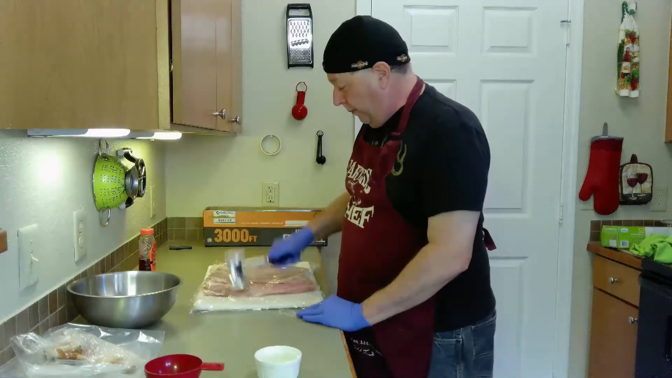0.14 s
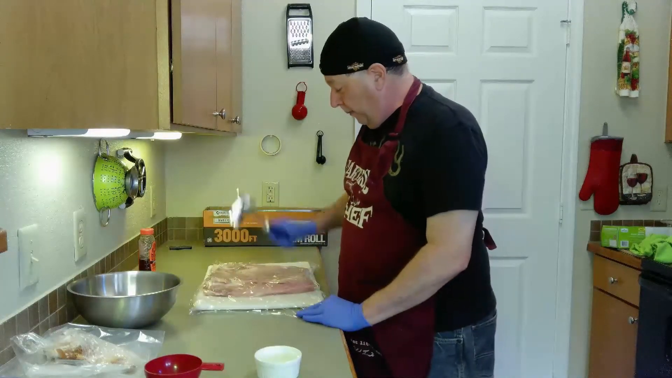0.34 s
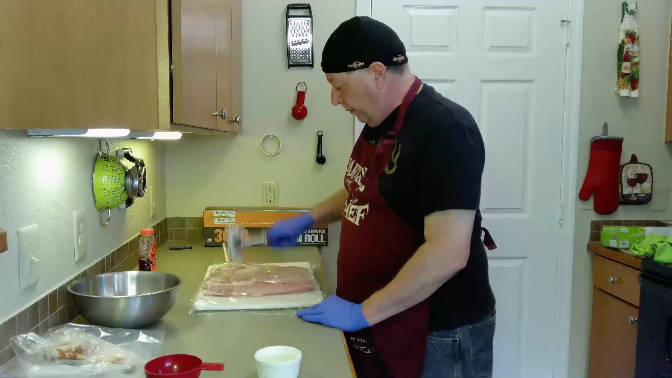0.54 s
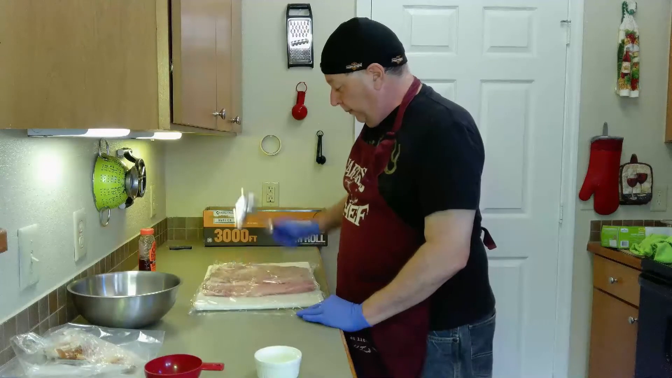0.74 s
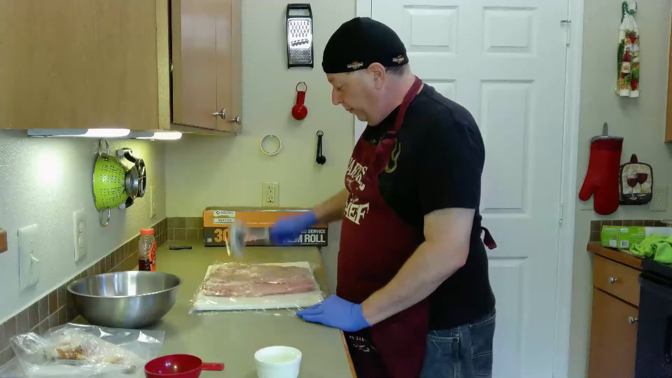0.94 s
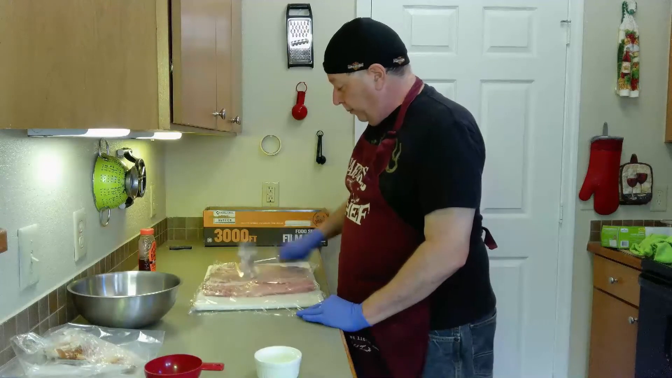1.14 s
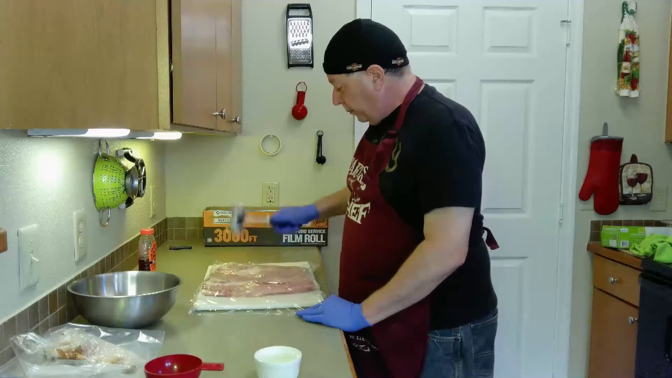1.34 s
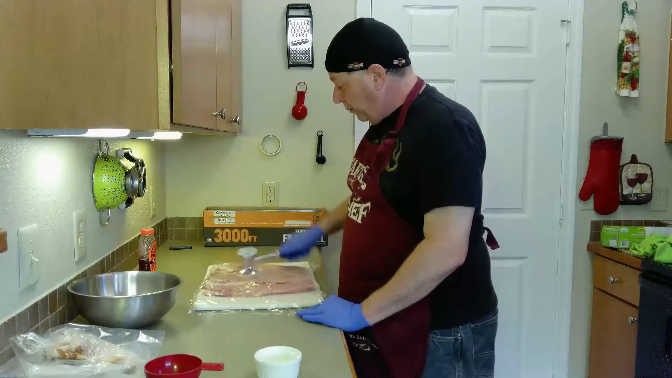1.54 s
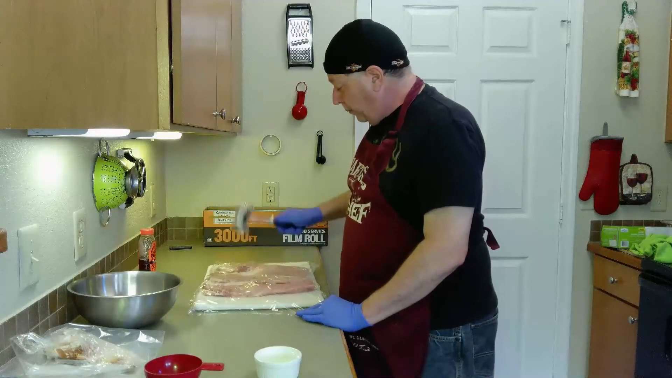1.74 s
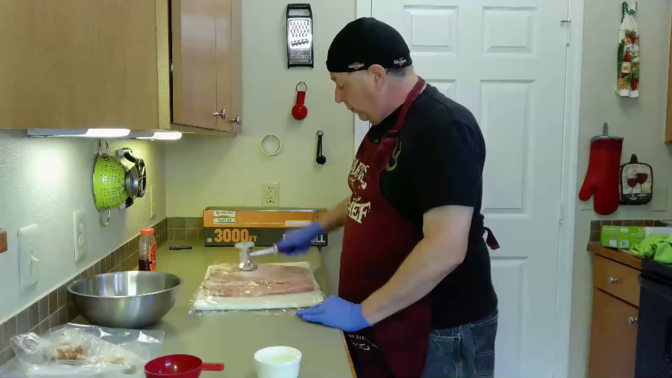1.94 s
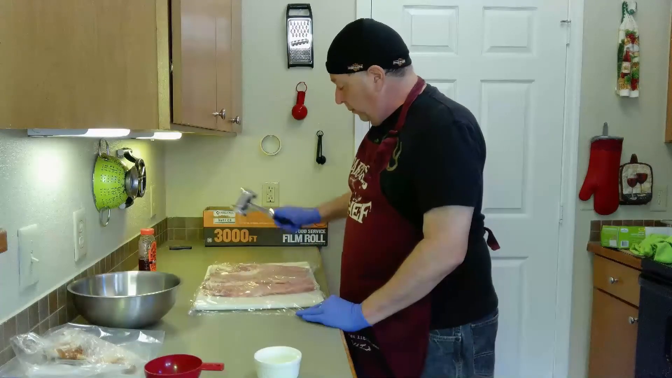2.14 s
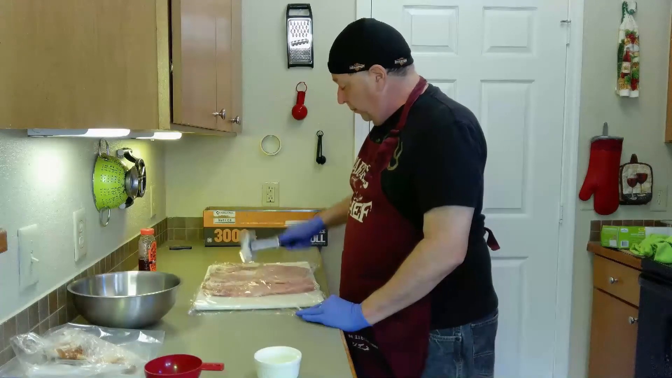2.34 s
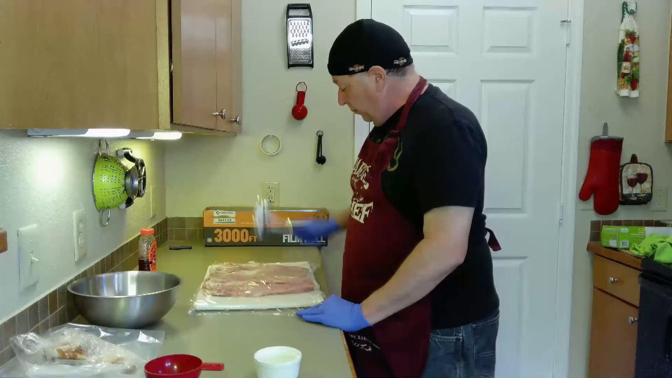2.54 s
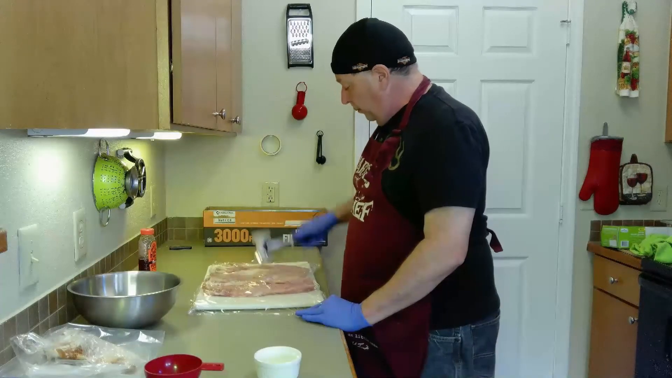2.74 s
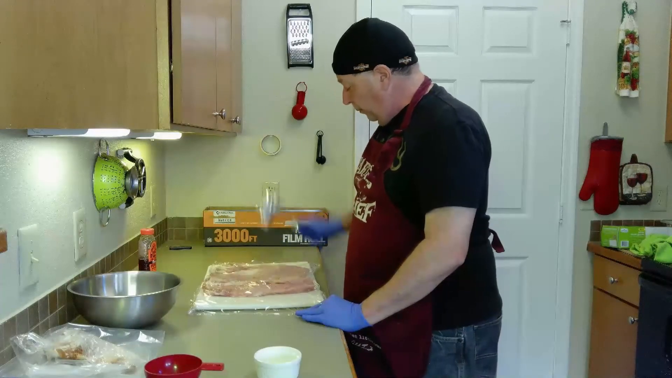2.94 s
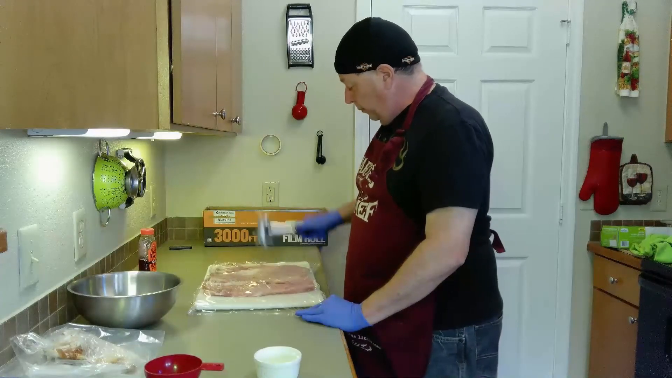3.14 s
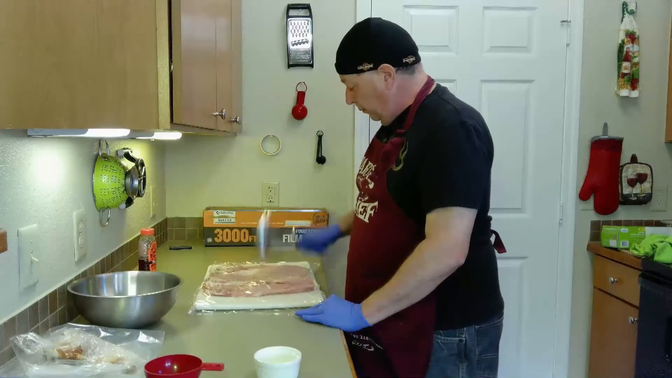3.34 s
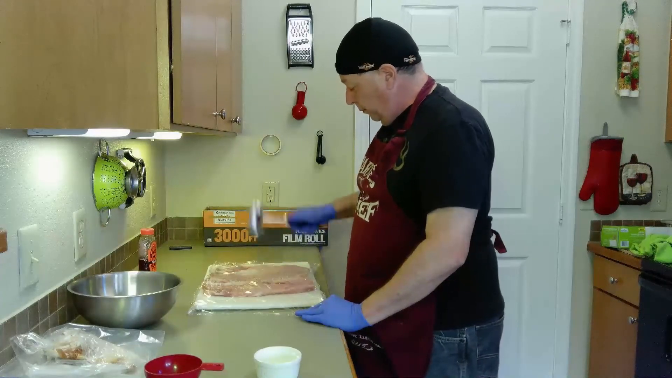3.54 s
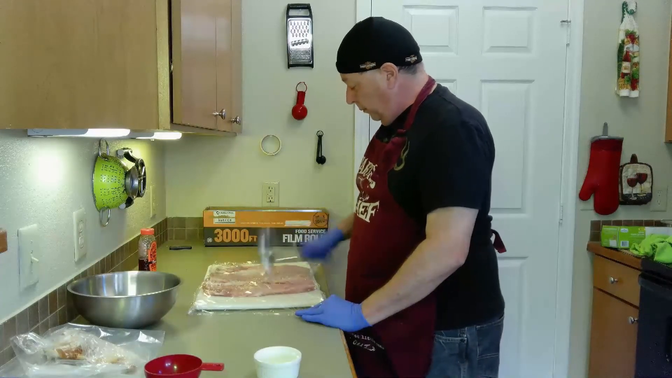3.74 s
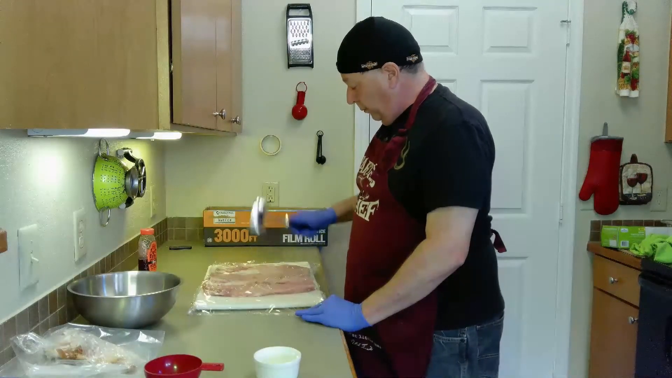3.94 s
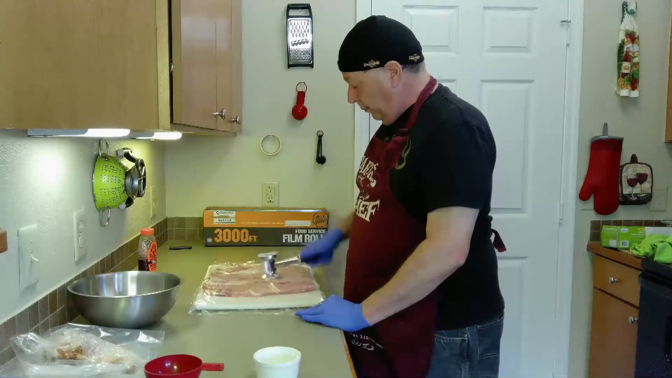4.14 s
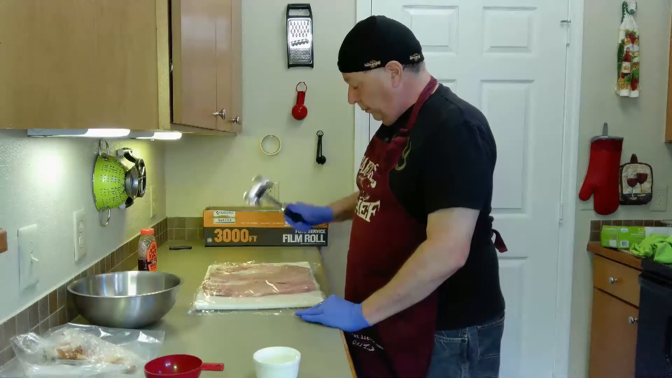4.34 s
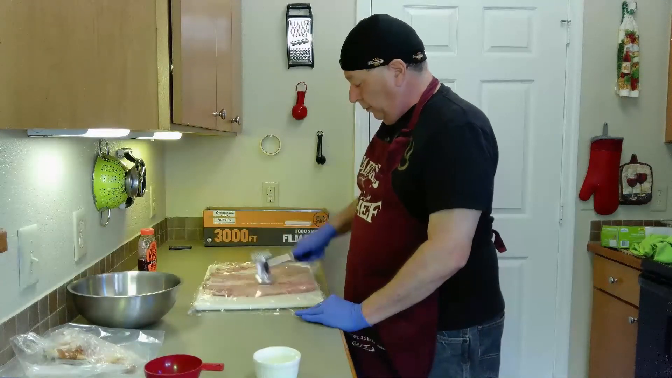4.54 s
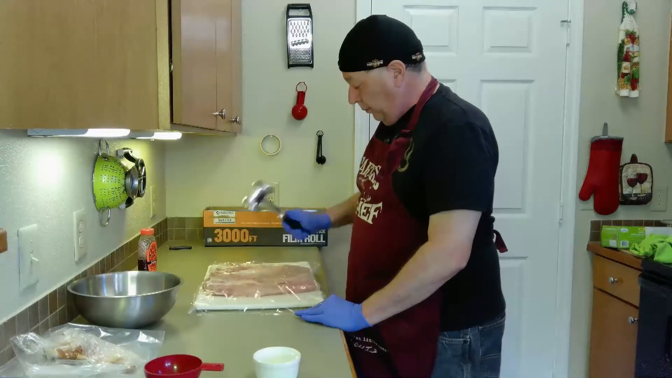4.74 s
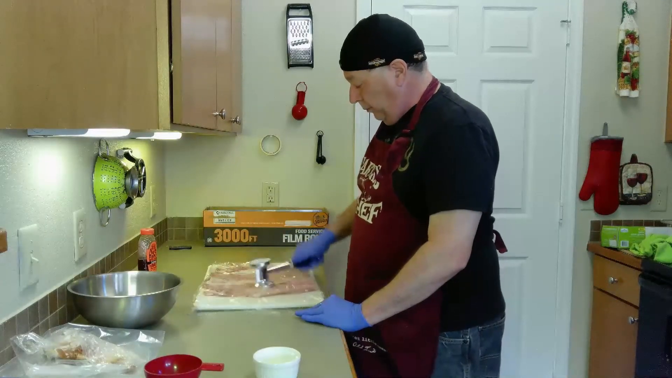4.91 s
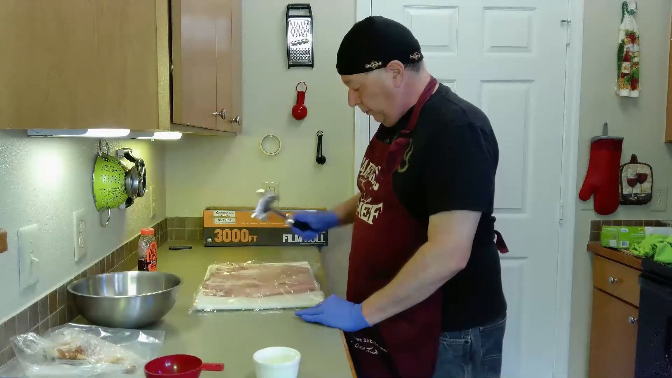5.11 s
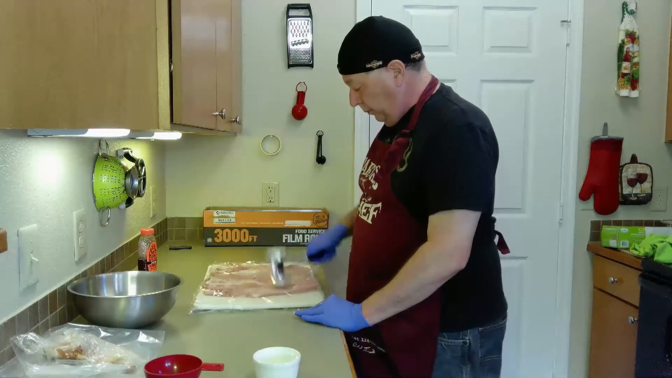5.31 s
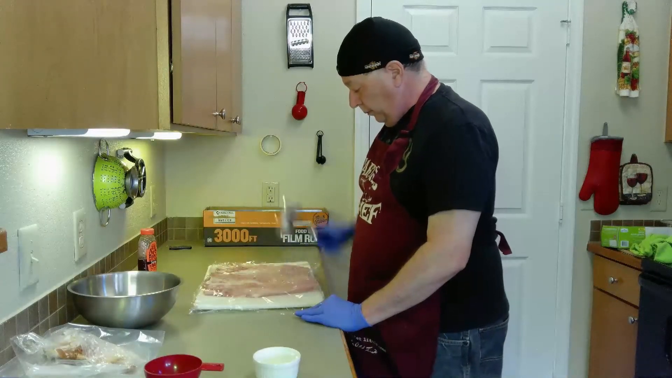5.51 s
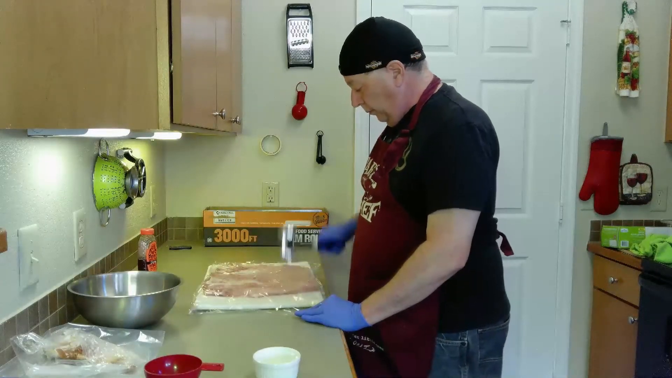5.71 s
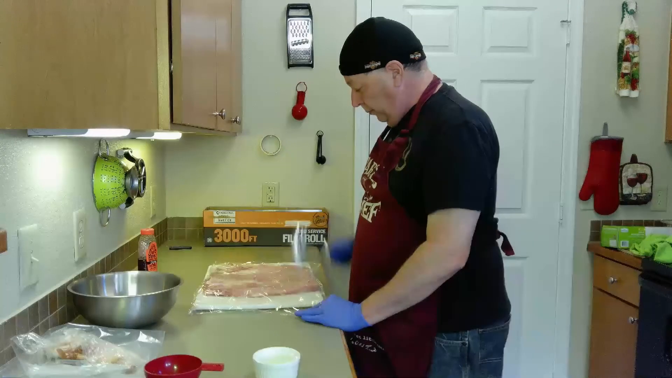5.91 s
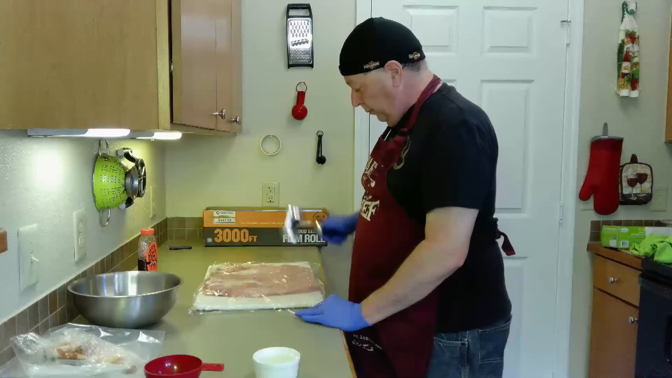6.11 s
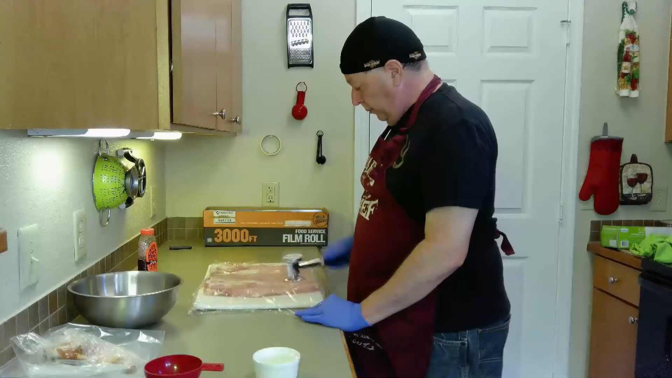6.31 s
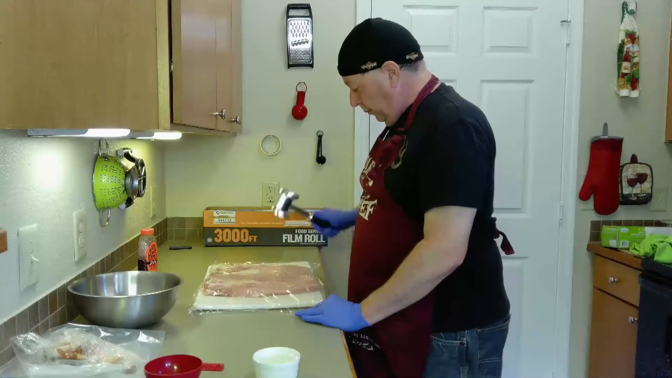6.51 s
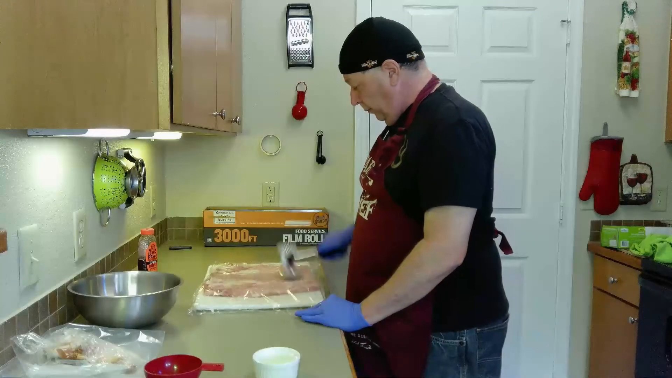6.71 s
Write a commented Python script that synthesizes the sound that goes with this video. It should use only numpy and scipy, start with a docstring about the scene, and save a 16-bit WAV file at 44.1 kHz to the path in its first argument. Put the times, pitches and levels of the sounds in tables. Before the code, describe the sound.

In a small, hard-walled kitchen, a metal mallet strikes plastic-covered meat at a steady pace, nearly three blows a second. Each is a bright, crackling wet slap with a low board knock and counter thud beneath, then a short tiled echo and sometimes a faint high metallic ring. Very quiet appliance hum lies underneath. One microphone at room distance slightly flattens the loudest cracks.

```python
"""A low appliance hum and still air in a small kitchen, then steady blows: a metal mallet on meat under film.
Each blow slaps the trapped air out (shaped noise), with tile and cupboard echoes and faint late treble noise.
The board knocks and the counter thuds (low modes and noise), and two close modes ring faintly in the mallet.
The room's tail is decaying noise. One microphone channel rounds off the loudest cracks and stops at a top frequency."""
import sys
import numpy as np
from scipy import signal
from scipy.fft import rfft, irfft, next_fast_len
from scipy.io import wavfile
from scipy.ndimage import uniform_filter1d

SR = 44100
rng = np.random.default_rng(int(sys.argv[2]) if len(sys.argv) > 2 else 0)


def write(x):
    x = np.atleast_2d(x).T
    wavfile.write(sys.argv[1], SR, np.round(np.clip(x, -1, 1) * 32767).astype(np.int16))

N = 302526

# Still room air, before levelling. Each row: frequency in Hz, gain in dB.
AIR_SPECTRUM = [(25, -3.5), (65, 3.5), (110, -4.5), (250, -10), (600, -15.5), (1500, -19.5), (3000, -26.5),
                (8000, -30.5), (15000, -32.5)]
# Appliance hum. Each row: frequency in Hz, rms level in dB.
HUM_TONES = [(59.8, -52.5), (70.5, -56.5), (120, -63)]
# The blows; smack on the film and jolt into the board are relative to an ordinary blow.
# Each row: first touch in seconds, lag from touch to slap in seconds, smack in dB, brightness in dB per octave,
# air pocket resonance in Hz, treble peak in dB, jolt in dB.
BLOWS = [(0.1469, 0.0048, 6, 0, 3030, -2, 6.5), (0.5108, 0.0028, 0.8, 0.7, 1500, -3.5, -4.5),
         (0.881, 0.0013, -0.5, -1.8, 2680, 2.5, 6.5), (1.2416, 0.001, 6.5, 1.85, 6090, 0.5, -2.5),
         (1.596, 0.0007, -0.5, 2, 2970, 2.5, -11), (1.96, 0.0006, -1.5, 0.56, 5620, -1.5, -4),
         (2.335, 0.0062, 1.7, 1.6, 5140, -1, -7.5), (2.699, 0.001, -4.5, -1, 3800, -0.5, -8.5),
         (3.0849, 0.0068, 1.5, -0.5, 2120, -2, -1.5), (3.4707, 0.0007, -4, -0.3, 5200, 1, -14.5),
         (3.831, 0.00074, -2.5, -0.8, 2900, 5, 4.5), (4.201, 0.0012, 5, -1.5, 2716, 7, 8),
         (4.5789, 0.0011, -3, -2, 1640, -1, 5), (4.942, 0.0015, -2.5, -1.1, 1570, 3.5, 4),
         (5.2997, 0.0065, 4.5, 0.94, 6260, -0.5, 3), (5.669, 0.0058, -1.7, 0, 5340, -2, 2.5),
         (6.011, 0.0033, 3.5, -0.76, 2540, 1.5, 6.5), (6.3558, 0.0005, -3.5, -0.06, 1090, 4, -11),
         (6.723, 0.002, -1.2, -1.4, 1710, 12, -2)]
# Film on wet meat, before levelling. Each row: frequency in Hz, gain in dB.
SLAP_SPECTRUM = [(150, -29), (400, -10), (650, -2), (1300, 1), (2200, -1), (4500, -1), (7200, -1),
                 (8400, -7), (9200, -23), (12000, -41)]
# What the walls keep of the slap after many bounces. Each row: frequency in Hz, gain in dB.
WALL_COLOUR = [(400, 4), (1500, 1.5), (3500, -2.5), (6800, -3), (8600, -3.5)]
# The kitchen's decay. Each row: frequency in Hz, t60 in seconds.
KITCHEN_DECAY = [(60, 0.46), (250, 0.37), (1000, 0.51), (3000, 0.32)]
# Late treble noise after each slap, before levelling. Each row: frequency in Hz, gain in dB.
LATE_TREBLE_SPECTRUM = [(5000, -17), (8500, 0.5), (10000, -6), (12500, -15), (14500, -18.5), (15600, -29)]
# Counter and cupboard modes. Each row: frequency in Hz, relative strength in dB, t60 in seconds.
COUNTER_MODES = [(44.3, -6.5, 0.33), (57.3, -3, .27), (74.64, -5, 0.72), (96.5, 3.5, 0.24),
                 (123.4, -3, 0.22), (137.7, -1.5, 0.26)]
# Dull boom of the room under the blow, before levelling. Each row: frequency in Hz, gain in dB.
BOOM_SPECTRUM = [(22, -38.5), (45, -0.5), (110, -1), (170, -0.5), (260, -16.5), (700, -46), (2000, -69.5)]
# Knock of the cutting board, before levelling. Each row: frequency in Hz, gain in dB.
BOARD_SPECTRUM = [(90, -23.5), (180, -0.5), (230, 1), (330, -0.5), (390, -6), (520, -11.5), (900, -15),
                  (3000, -58.5)]
# The mallet's close pair of bending modes. Each row: frequency in Hz, relative strength in dB, t60 in seconds.
MALLET_MODES = [(2493, 2, 0.38), (2502, 2, 0.3)]

TOP_HZ = 15700  # upper band limit
BLOW_SPAN = 0.12  # s over which the sounds of a blow are levelled
PEAK_HZ = 7880  # centre of the slap's narrow treble boost or cut
SLAP_DB = -21  # slap of an ordinary blow
# A jolting blow fills the room; a sharp smack stands out of it (dB, dB per dB).
ROOM_DB, ROOM_PER_JOLT, ROOM_PER_SMACK = 7, 0.21, -0.3
# Resonance of fully sealed air, stronger the harder it is squeezed (dB, dB per dB).
POCKET_DB, POCKET_PER_SMACK = 6.5, 0.9
LEAK_S = 0.004  # a head landing on its edge lets air leak: the resonance in dB falls by e per this much lag
# Late treble follows smack and treble peak (dB, dB per dB) and brightness (octaves).
TREBLE_DB, TREBLE_PER_SMACK, TREBLE_PER_PEAK, TREBLE_OCTAVES = -40, 0.4, 0.3, 2.1
THUD_DB, THUD_PER_JOLT = -27.5, 0.14  # a hard jolt shakes the counter a little more (dB, dB per dB)
# The board knocks with both jolt and smack (dB, dB per dB).
KNOCK_DB, KNOCK_PER_JOLT, KNOCK_PER_SMACK = -28.3, 0.23, 0.47
CUSHION = 0.45  # trapped air cushions the knock (dB per dB of air pocket)
RING_DB = -35.5  # mallet ring of an ordinary blow


def amp(db):
    """Amplitude ratio of a level in dB."""
    return 10 ** (np.asarray(db) / 20)


def along(points, hz):
    """Interpolate (Hz, value) points on a log-frequency axis."""
    point_hz, values = np.transpose(points)
    return np.interp(np.log(hz + 1), np.log(point_hz + 1), values)


def level(x, span=None):
    """x scaled to rms 1 over its first span seconds (all of it by default)."""
    head = x if span is None else x[:int(span * SR)]
    return x / np.sqrt(np.mean(head ** 2) + 1e-20)


def fade(t, t60):
    """Exponential decay, 60 dB down after t60."""
    return np.exp(-np.log(1000) * t / t60)


def bump(hz, centre_hz, octaves):
    """A bell curve of height 1 on a log-frequency axis."""
    return np.exp(-(np.log2((hz + 1) / centre_hz) / octaves) ** 2)


def colour(x, curve):
    """Causal minimum-phase filter whose gain in dB is curve(Hz)."""
    size = 2 * next_fast_len(len(x))
    gain = amp(curve(np.fft.rfftfreq(size, 1 / SR)))
    cepstrum = irfft(np.log(gain + 1e-6))
    # fold the cepstrum forward in time, so nothing sounds early
    cepstrum[1:size // 2] *= 2
    cepstrum[size // 2 + 1:] = 0
    response = np.exp(rfft(cepstrum))
    return irfft(rfft(x, size) * response)[:len(x)]


def add(track, s, sound):
    """Mix a sound into the track at time s."""
    part = track[round(s * SR):][:len(sound)]
    part += sound[:len(part)]


def background():
    """Still air is coloured noise; the appliance hum is steady sines at random phases."""
    t = np.arange(N) / SR
    air = level(colour(rng.standard_normal(N), lambda hz: along(AIR_SPECTRUM, hz)))
    hum = np.zeros(N)
    for hz, db in HUM_TONES:
        hum += amp(db) * np.sqrt(2) * np.sin(2 * np.pi * (hz * t + rng.random()))
    return amp(-54) * air + hum


def spread(contact, arrivals):
    """Dense noise whose power is that of the contact, smeared over the arrival times of its echoes."""
    power = np.abs(signal.fftconvolve(contact ** 2, arrivals)[:len(contact)])
    return np.sqrt(power) * rng.standard_normal(len(contact))


def kitchen(t, contact, room_db, walls_db, walls_at, walls_spread):
    """Direct sound, a cluster of echoes from tiles and cupboards, then a duller diffuse tail."""
    walls = np.exp(-((t - walls_at) / walls_spread) ** 2)
    direct = t == 0
    near = spread(contact, direct + amp(walls_db) ** 2 * walls / walls.sum())
    diffuse = (fade(t, t60=0.32) * (1 - np.exp(-t / 0.02))) ** 2
    far = spread(contact, diffuse / diffuse.sum())
    far = colour(far, lambda hz: along(WALL_COLOUR, hz))
    # single echoes stand out early on and merge as the sound spreads
    echoes = level(uniform_filter1d(rng.standard_normal(len(t)), size=40))
    echoes_db = 1.2 * echoes * fade(t, t60=0.8)
    return (near + amp(room_db) * far) * amp(echoes_db)


def echo_ripple(depth_db, count=70):
    """Echoes reinforce and cancel at new frequencies on each blow: random dB as a function of Hz."""
    gains_db = depth_db * rng.standard_normal(count)
    return lambda hz: np.interp(hz, np.linspace(0, TOP_HZ, count), gains_db)


def slap(t, lag, bright_db, pocket_hz, pocket_db, peak_db, room_db):
    """The film crackles as the head touches it, then cracks as the trapped air bursts out and the meat squashes."""
    after = np.maximum(t - lag, 0)
    touch = amp(-11.5) * (t < lag)
    burst = (t >= lag) * (fade(after, t60=0.0062) + amp(-23) * fade(after, t60=0.037))
    heard = kitchen(t, touch + burst, room_db, walls_db=6.5, walls_at=0.0064, walls_spread=0.0084)
    ripple = echo_ripple(depth_db=1.5)

    def curve(hz):
        # a flatter blow is brighter
        tilt = bright_db * np.log2(np.clip(hz, 400, 8000) / 2000)
        # the air pocket under the head resonates
        pocket = pocket_db * bump(hz, pocket_hz, octaves=0.51)
        # a narrow boost or cut in the treble
        peak = peak_db * bump(hz, PEAK_HZ, octaves=0.19)
        return along(SLAP_SPECTRUM, hz) + tilt + pocket + peak + ripple(hz)

    return level(colour(heard, curve), BLOW_SPAN)


def tail(t, build):
    """Diffuse answer of the kitchen, energy 1: it builds up, then each frequency dies at its own speed."""
    hz, when, noise = signal.stft(rng.standard_normal(len(t)), SR, nperseg=256)
    decay = fade(when, along(KITCHEN_DECAY, hz)[:, None])
    x = signal.istft(noise * decay, SR, nperseg=256)[1][:len(t)]
    x *= 1 - np.exp(-t / build)
    return x / np.linalg.norm(x)


def late_treble(t):
    """Faint treble noise, mostly 7 to 11 kHz, rises within about 13 ms of the slap and decays."""
    noise = tail(t, build=0.013)
    return level(colour(noise, lambda hz: along(LATE_TREBLE_SPECTRUM, hz)), BLOW_SPAN)


def ringing(t, modes, scatter_db, detune_hz, attack):
    """Damped modes, struck at new strengths, signs and slightly shifted pitches by every blow."""
    hz, db, t60 = np.transpose(modes)[:, :, None]
    strength, drift, side = rng.standard_normal((3, len(modes), 1))
    waves = np.sign(side) * np.sin(2 * np.pi * (hz + detune_hz * drift) * t)
    struck = amp(db + scatter_db * strength) * fade(t, t60) * waves
    return np.sum(struck, axis=0) * (1 - np.exp(-t / attack))


def rumble(t, spectrum):
    """A soft push, coloured by what it strikes and spread by the room."""
    return level(colour(tail(t, build=0.0058), lambda hz: along(spectrum, hz)), BLOW_SPAN)


def thud(t):
    """The meat cushions the blow, so low modes of the counter and cupboards answer, over the room's boom."""
    modes = ringing(t, COUNTER_MODES, scatter_db=3.5, detune_hz=0.95, attack=0.014)
    counter = level(modes, BLOW_SPAN)
    return level(counter + amp(-6.5) * rumble(t, BOOM_SPECTRUM), BLOW_SPAN)


def knock(t):
    """The cutting board answers the push with a short low knock of coloured noise."""
    return rumble(t, BOARD_SPECTRUM)


def ring(t):
    """The mallet sings after the blow; its two modes and their echoes beat unevenly."""
    tone = ringing(t, MALLET_MODES, scatter_db=1.5, detune_hz=2, attack=0.008)
    in_room = signal.fftconvolve(tone, tail(t, build=0.0033))[:len(t)]
    # the hand damps what is left
    grip = np.exp(-(t / 0.3) ** 2)
    return level((in_room + amp(-2) * tone) * grip, 2 * BLOW_SPAN)


def pounding():
    """Each blow's smack drives slap and late treble, its jolt thud and ring, and both drive the board's knock."""
    track = np.zeros(N)
    t = np.arange(SR * 3 // 4) / SR
    for s, lag, smack_db, bright_db, pocket_hz, peak_db, jolt_db in BLOWS:
        sealed = np.exp(-lag / LEAK_S)
        pocket_db = (POCKET_DB + POCKET_PER_SMACK * smack_db) * sealed
        room_db = ROOM_DB + ROOM_PER_JOLT * jolt_db + ROOM_PER_SMACK * smack_db
        treble_db = TREBLE_DB + TREBLE_PER_SMACK * smack_db + TREBLE_PER_PEAK * peak_db
        treble_db += TREBLE_OCTAVES * bright_db
        thud_db = THUD_DB + THUD_PER_JOLT * jolt_db
        knock_db = KNOCK_DB + KNOCK_PER_JOLT * jolt_db + KNOCK_PER_SMACK * smack_db
        knock_db -= CUSHION * pocket_db
        crack = slap(t, lag, bright_db, pocket_hz, pocket_db, peak_db, room_db)
        add(track, s, amp(SLAP_DB + smack_db) * crack)
        add(track, s + lag, amp(treble_db) * late_treble(t))
        add(track, s + lag, amp(thud_db) * thud(t))
        add(track, s + lag, amp(knock_db) * knock(t))
        add(track, s + lag, amp(RING_DB + jolt_db) * ring(t))
    return track


def scene():
    """The quiet kitchen and the pounding together, on one channel."""
    return (background() + pounding())[None]


def record(dry):
    """The microphone channel flattens the loudest cracks near full scale, then drops all above the band limit."""
    clipped = dry / (1 + np.abs(dry) ** 6) ** (1 / 6)
    size = next_fast_len(N + SR)
    passband = np.fft.rfftfreq(size, 1 / SR) < TOP_HZ
    return irfft(rfft(clipped, size) * passband, size)[:, :N]


dry = scene()
out = record(dry)
write(out)
```